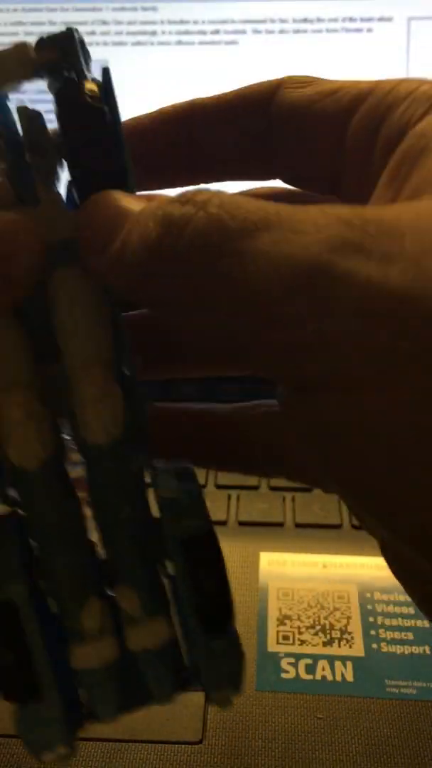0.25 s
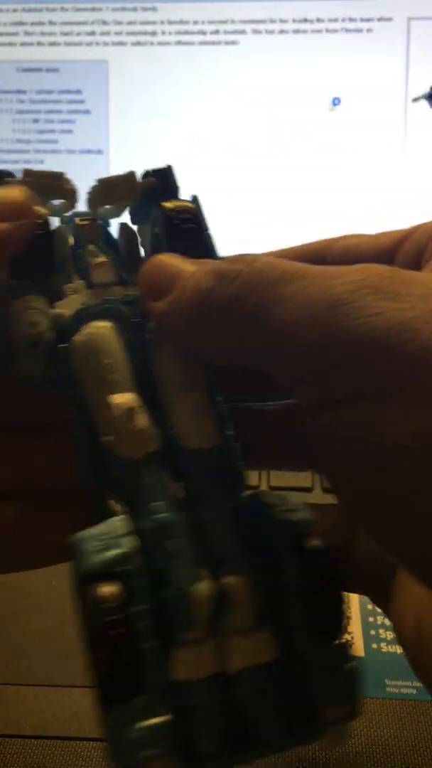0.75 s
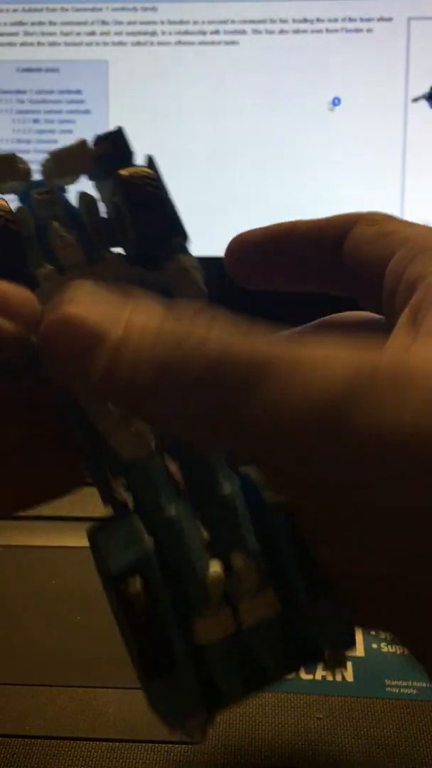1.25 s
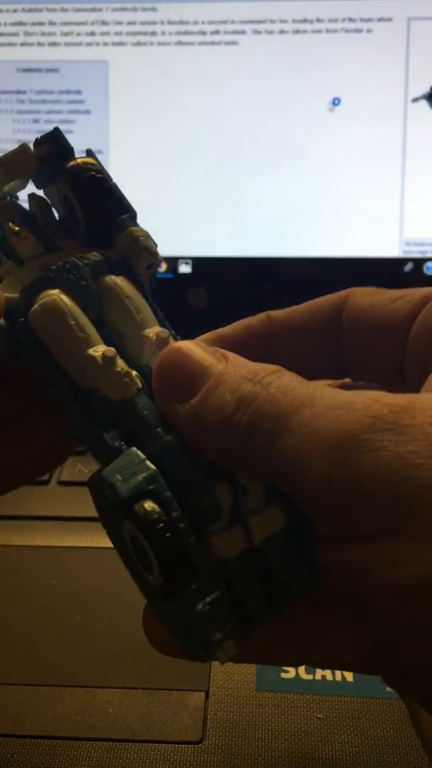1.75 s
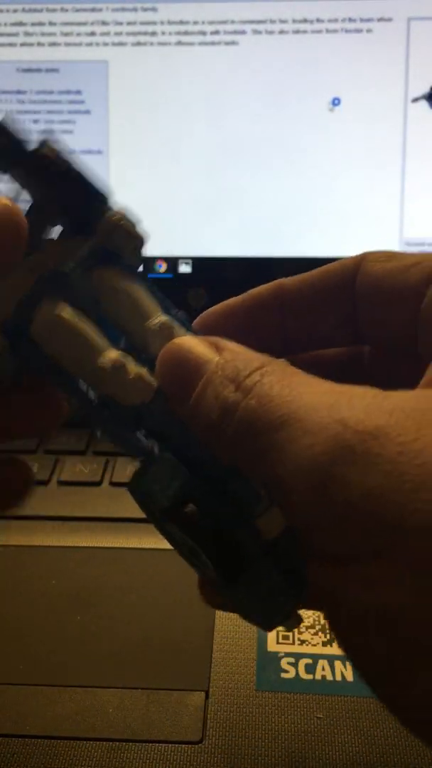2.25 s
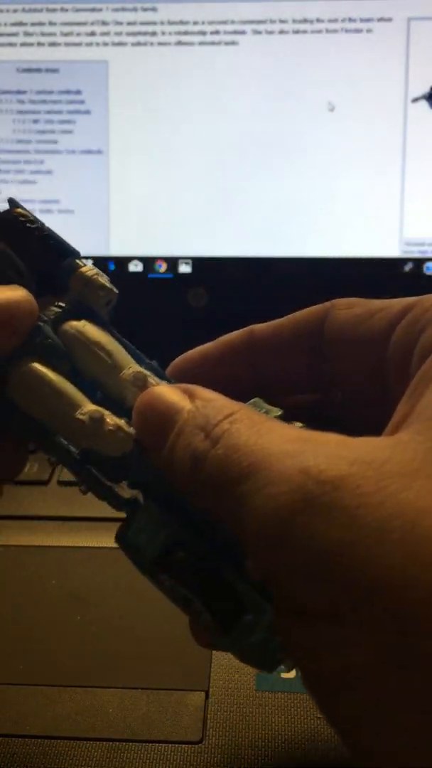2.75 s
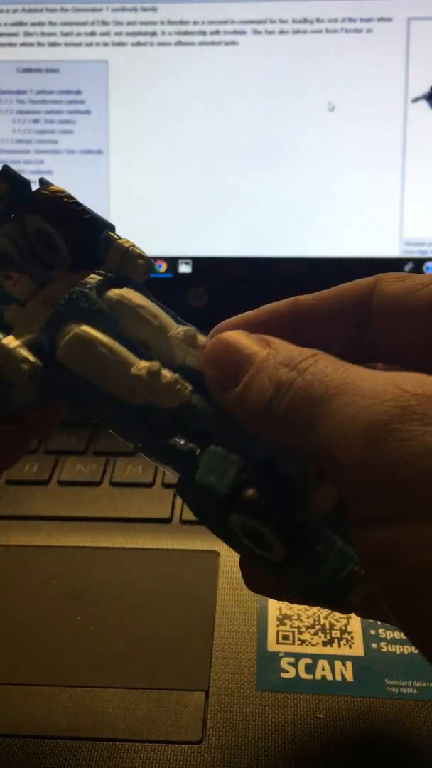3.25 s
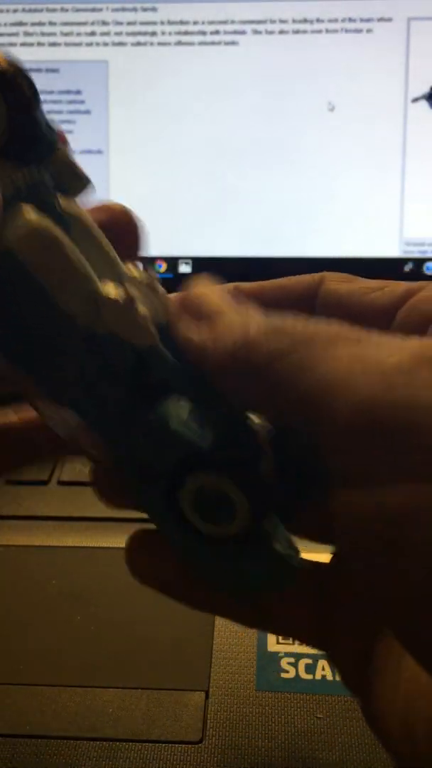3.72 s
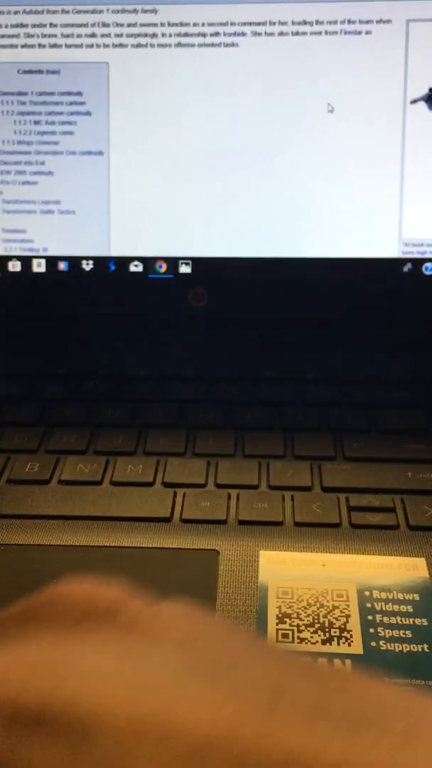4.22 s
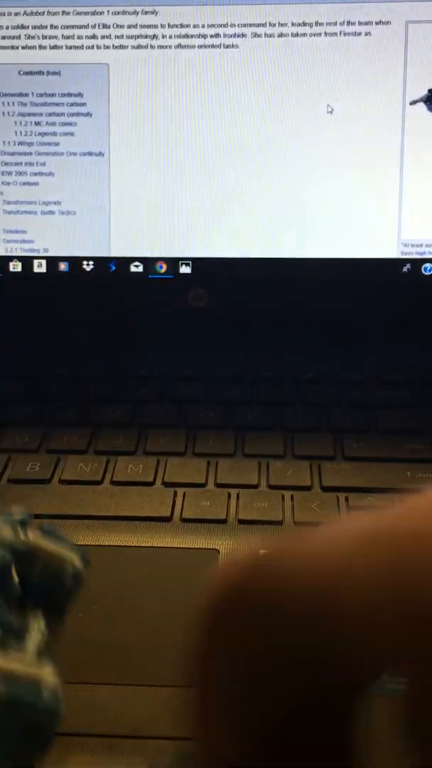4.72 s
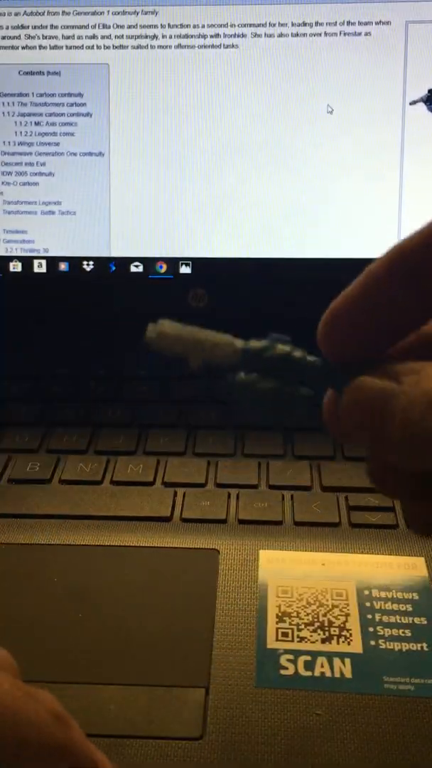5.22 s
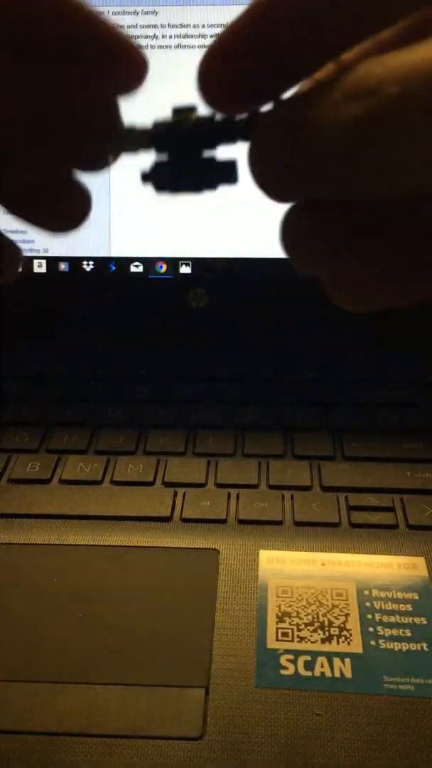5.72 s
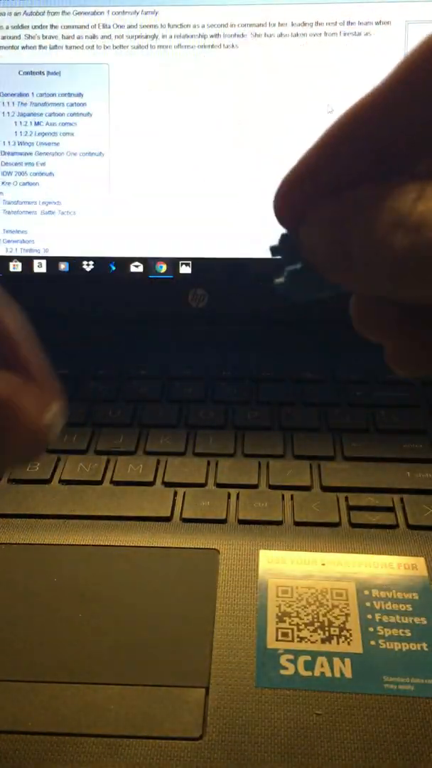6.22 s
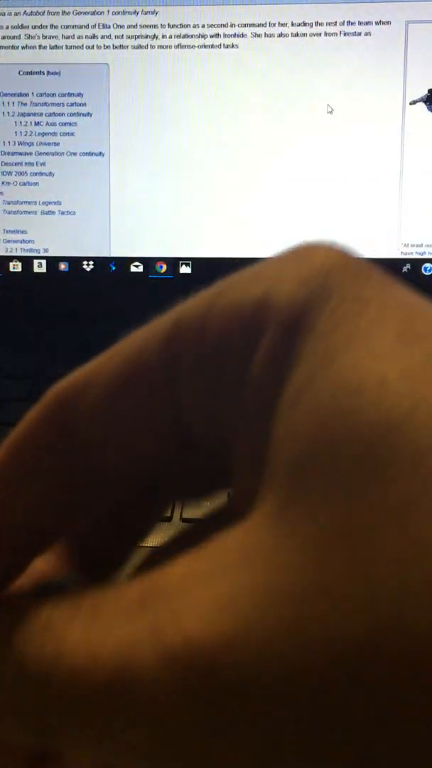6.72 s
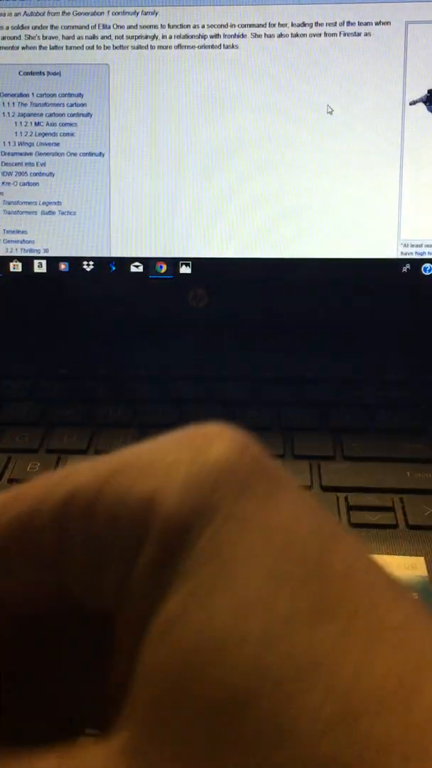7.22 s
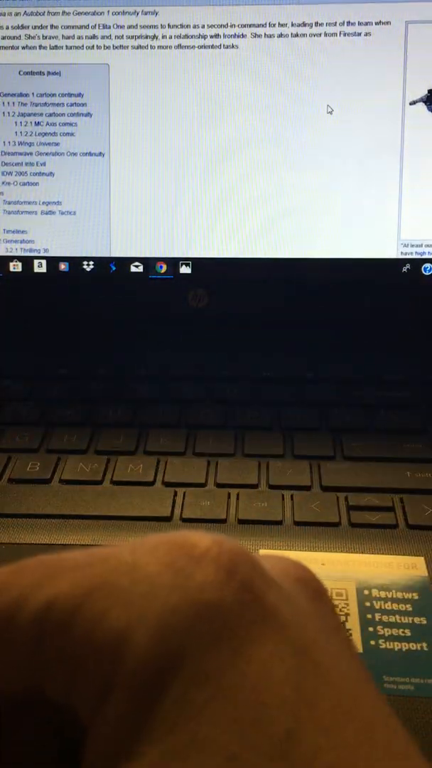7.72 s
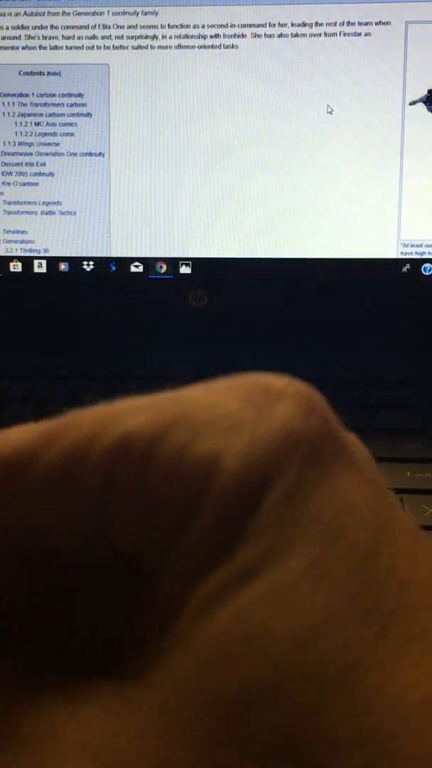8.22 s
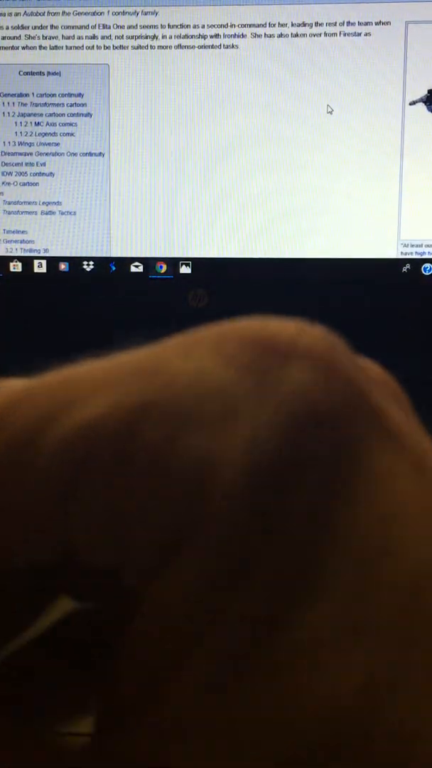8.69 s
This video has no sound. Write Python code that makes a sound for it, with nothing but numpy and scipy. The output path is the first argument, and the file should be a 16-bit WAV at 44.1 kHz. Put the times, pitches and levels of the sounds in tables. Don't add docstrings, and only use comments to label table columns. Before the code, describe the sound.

Close hollow plastic ticks and snaps as a toy figure is folded, then a small part bounces sharply on a laptop, followed by desk knocks and scuffs.

```python
import sys
import numpy as np
from scipy import signal
from scipy.fft import rfft, irfft, next_fast_len
from scipy.io import wavfile
from scipy.ndimage import uniform_filter1d

SR = 44100
rng = np.random.default_rng(int(sys.argv[2]) if len(sys.argv) > 2 else 0)


def to_linear_factor(level_db):
    exponent = np.asarray(level_db, float) / 20
    return 10 ** exponent


def generate_wav(sig):
    pcm = np.round(np.clip(np.atleast_2d(sig).T, -1, 1) * 32767).astype(np.int16)
    wavfile.write(sys.argv[1], SR, pcm)


N = 394694


def rms_one(x):
    return x / np.sqrt(np.mean(x ** 2) + 1e-20)


def peak_one(x):
    return x / np.max(np.abs(x))


def filtered(x, order, hz, kind):
    return signal.sosfilt(signal.butter(order, hz, kind, fs=SR, output="sos"), x)


def in_time(rows):
    s, *columns = np.transpose(rows)
    return [np.interp(np.arange(N) / SR, s, c) for c in columns]


def gated(spans, fade_db):
    out, edge_s = np.zeros(N), .015
    for start, top, end, db in spans:
        first = max(round((start - edge_s) * SR), 0)
        last = min(round((end + edge_s) * SR), N)
        during = np.arange(first, last)
        times_s = [start - edge_s, start, top, end, end + edge_s]
        levels_db = [-130, db - fade_db[0], db, db - fade_db[1], -130]
        out[during] += to_linear_factor(np.interp(during / SR, times_s, levels_db))
    return out


def drift(rate_hz):
    r = np.exp(-80 * np.pi * rate_hz / SR)
    slow = signal.lfilter([1], [1, -2 * r, r * r], rng.standard_normal(N // 40 + 2002))[2000:]
    return np.interp(np.arange(N) / 40, np.arange(len(slow)), rms_one(slow))


def coloured(spectrum, patchy_db):
    size = next_fast_len(N)
    hz = np.fft.rfftfreq(size, 1 / SR) + 1
    points = np.array(spectrum)
    level_db = np.interp(np.log(hz), np.log(points[:, 0]), points[:, 1], -90, -90)
    shaped = rfft(rng.standard_normal(size)) * to_linear_factor(level_db)
    register = np.floor(np.log2(hz / 20) / 2)
    out = 0
    for k in range(5):
        out = out + irfft(shaped * (register == k), size)[:N] * to_linear_factor(patchy_db * drift(2.8))
    return rms_one(out)


def slips(per_s, spread_db):
    size = to_linear_factor(spread_db * np.minimum(rng.exponential(1, N), 4))
    return size * rng.choice([-1, 1], N) * (rng.random(N) < per_s / SR)


def ring(x, hz, t60_s):
    r, w = to_linear_factor(-60 / (t60_s * SR)), 2 * np.pi * hz / SR
    return signal.lfilter([0, np.sin(w)], [1, -2 * r * np.cos(w), r * r], x + 1e-18)


def body(x, modes, scatter, near_hz=None, bend_share=.018):
    out = 0
    for (hz, db, t60_s), (spread, bend) in zip(modes, scatter):
        far_db = -5.5 * abs(np.log2(hz / near_hz)) if near_hz else 0
        mode = peak_one(ring(x, hz * (1 + bend_share * bend), t60_s))
        out = out + to_linear_factor(db + far_db + 1.8 * spread) * mode
    return peak_one(out)


# f/Hz, level/dB, t60/s
CASE_MODES = [(340, -19, 0.018), (455.3, 0, 0.06), (464, 3, 0.081), (574, 1, 0.027), (697, 11, 0.034),
              (857, 5, 0.08), (1040.6, -2.5, 0.078)]


def clicks(events, modes, edges, own_db, swell, after_db, cut_hz, own_t60_s, reach):
    out, t = np.zeros(N + 4096), np.arange(4096) / SR
    for s, peak_db, hz, crisp_db, contact_ms, *thump_db in events:
        chance, scatter = rng.standard_normal((2, len(t))), rng.standard_normal((3, 8, 2))
        spell = t / (max(contact_ms, .1) / 1000)
        force = peak_one(spell ** swell * np.exp(-2.5 * spell))
        shiver = np.minimum(spell, 1) * np.exp(-t / .009) * chance[1] ** 2
        chatter = (chance[0] * (force + to_linear_factor(after_db) * shiver))[:2048]
        snap = (chance[0] * force)[:2048]

        own = peak_one(ring(snap, hz, own_t60_s))
        bright = body(chatter, modes, scatter[1], hz) + to_linear_factor(own_db) * own
        blunt = signal.butter(2, min(reach * hz, .45 * SR), fs=SR)
        bright = peak_one(signal.lfilter(*blunt, bright))
        dull = hz < 3200 and peak_db < -24 and not thump_db
        crisp = body(snap, edges[:2] if dull else edges, scatter[2])
        bright = bright + to_linear_factor(crisp_db - 3.0) * crisp

        at = max(round((s - .00018 * swell * contact_ms) * SR), 0)
        out[at:at + len(bright)] += to_linear_factor(peak_db - 4.0) * filtered(bright, 5, cut_hz, "high")
        for db in thump_db:
            thump = body(force * np.abs(chance[0]), CASE_MODES, scatter[0], bend_share=.02)
            out[at:at + len(t)] += to_linear_factor(peak_db + db + 0.5) * filtered(thump, 6, 330, "high")
    return out[:N]


# f/Hz, level/dB, t60/s
SHELL_MODES = [(1320, -3, 0.0094), (1940, -7.5, 0.032), (2200, -8.5, 0.03), (2876, -8.5, 0.056),
               (3620, 7.5, 0.0022), (4438, 3.5, 0.005), (5508, 10, 0.0036), (6420, 4, 0.0068)]
# f/Hz, level/dB, t60/s
EDGE_MODES = [(8670, 8.5, 0.0056), (8930, 12, 0.0017), (11000, -2.5, 0.01), (11200, -6.5, 0.009),
              (15000, -10, .002)]
# t/s, peak/dB, contact/ms
UPPER_TICKS = [(.0014, -41.5, 4.7), (0.064, -30.5, 1.65), (0.0707, -33, 2.9), (0.112, -31, 0.7),
               (0.1395, -30.5, .6), (0.217, -33, 0.95), (0.241, -25.5, 1.3), (.261, -28, 1.3),
               (0.281, -24, 1.4), (.3422, -35.5, 0.37), (0.4272, -33.5, 1.84), (0.454, -35, 1.1),
               (.533, -42, 2), (1.5517, -36, 1.5), (2.717, -34.5, 1.6), (3.2784, -19, 1.07),
               (3.2874, -58, 2.2), (3.4453, -39.5, 2.9), (3.456, -35.5, 2), (3.4708, -25, 1.76),
               (3.9493, -35, 4.9), (3.9674, -43, 3.5), (3.9796, -40, 1.05), (4.029, -26, 0.96),
               (4.0594, -34, 0.72), (4.082, -30, 3)]
# t/s, peak/dB, contact/ms
LOWER_TICKS = [(0.1777, -31.5, 1.9), (0.289, -27, 0.52), (.3044, -39, 1.5), (.3254, -37.5, 1.2),
               (0.356, -37, 1.6), (0.3748, -35, 0.95), (0.3992, -36, 2), (.482, -41, 1.46),
               (.4954, -47, 1.5), (0.671, -40.5, 0.41), (1.208, -51, 1.7), (1.274, -42, 4.2),
               (1.3128, -50, 3.5), (1.421, -42, 2.8), (1.479, -32.5, 3.8), (2.379, -47, 1.4)]
# t/s, peak/dB, loudest f/Hz, contact/ms
PANEL_KNOCKS = [(.444, -35, 1210, 0.5), (0.9226, -33.5, 6000, 1.17), (1.4624, -17.5, 6850, 1.48),
                (1.5384, -15, 6400, 0.9), (1.572, -31, 6400, 1.34), (1.711, -47.5, 1340, 1.05),
                (1.783, -51, 1410, 0.72), (2.4613, -44, 2350, 3.5), (2.5465, -44, 2520, 0.9),
                (2.583, -28, 6640, 2.7), (2.663, -44.5, 1210, 2.7), (2.6997, -40.5, 2230, 0.8),
                (3.0807, -25, 4180, 3.1), (3.6584, -43, 2200, 2.64), (3.7728, -32, 2370, 0.6),
                (3.861, -26.5, 8940, 1.65), (4.013, -21, 3620, 1.37), (4.072, -22.5, 6400, 1.47),
                (4.346, -53, 1350, 0.95), (4.3815, -46, 3400, 1.5)]
# t/s, peak/dB, loudest f/Hz
SNAPS = [(.082, -27, 2830), (0.1517, -35, 2830), (0.19, -30, 3000), (0.236, -32, 2850), (.383, -25, 2920),
         (0.4666, -20.5, 2800), (0.5768, -33, 1880), (0.602, -49, 1840), (0.6528, -46, 7560),
         (0.709, -32.5, 2830), (0.9536, -40.5, 3100), (1.0134, -50, 1910), (1.1796, -50, 1230),
         (1.432, -36.5, 1940), (1.5274, -30, 4250), (1.6683, -48.5, 6200), (1.8333, -32, 6900),
         (1.8487, -21.5, 8170), (2.8777, -43, 6230), (3.022, -47.5, 7550), (3.26, -48, 6200),
         (3.6378, -48, 2460), (3.7925, -42, 2000), (3.8467, -42, 6250), (4.002, -46, 2820),
         (4.0236, -20.5, 4530), (4.0855, -26, 6400)]
# t/s, peak/dB, loudest f/Hz, rel thump/dB
DESK_KNOCKS = [(4.526, -43, 2580, 0), (4.5964, -33.5, 1220, -10), (4.833, -37, 4030, -27),
               (4.9207, -38.5, 3620, -30), (6.7881, -20, 3970, -19.5), (6.804, -21.5, 2350, -14),
               (6.8487, -26, 2820, -19), (7.333, -41.5, 2250, -24), (7.3521, -22.5, 3140, -26),
               (7.3772, -33, 3100, -9), (7.3932, -28, 3100, -8), (7.452, -38, 2780, -9),
               (7.481, -15.5, 5300, -24), (7.7727, -41.5, 2730, -1), (7.835, -26, 2030, -12),
               (7.9012, -40.5, 1485, 0), (7.9447, -45, 1930, -0.5)]
# t/s, peak/dB, loudest f/Hz, rel crispness/dB, rel thump/dB
DESK_SNAPS = [(4.6169, -32, 1230, -9, -6), (4.6524, -15, 3900, -8.5, -16), (4.8497, -26.5, 3560, 4.3, -39),
              (4.9604, -41.5, 1410, -20, -8), (6.1653, -50.5, 1980, 7, -12),
              (7.1806, -42.5, 2280, -8.5, -0.5), (7.4999, -11.5, 5400, -13, -16),
              (7.5983, -17, 4600, -6.5, -24), (7.664, -27, 2830, -9, -12), (7.845, -32.5, 2700, 5, -12),
              (7.9623, -54, 6450, -14.5, -5), (8.0641, -43, 4570, -10, -12), (8.1414, -60, 1230, 3, -3),
              (8.4206, -49.5, 8000, 15, 11), (8.5567, -50, 1320, -14.5, -9), (8.8239, -25, 4200, 3, -12),
              (8.8572, -27.5, 5260, -11.5, -7.5)]
UPPER_HZ, LOWER_HZ = 2850, 1830
TICK_CRISP_DB, KNOCK_CRISP_DB, SNAP_CRISP_DB = -12, -13.5, -3.5
SNAP_CONTACT_MS, DESK_KNOCK_MS, DESK_SNAP_MS = 2.1, 0.8, 1.6


def figure_clicks():
    events = [(s, db, UPPER_HZ, TICK_CRISP_DB, ms) for s, db, ms in UPPER_TICKS]
    events += [(s, db, LOWER_HZ, TICK_CRISP_DB, ms) for s, db, ms in LOWER_TICKS]
    events += [(s, db, hz, KNOCK_CRISP_DB, ms) for s, db, hz, ms in PANEL_KNOCKS]
    events += [(s, db, hz, SNAP_CRISP_DB, SNAP_CONTACT_MS) for s, db, hz in SNAPS]
    events += [(s, db, hz, KNOCK_CRISP_DB, DESK_KNOCK_MS, thump) for s, db, hz, thump in DESK_KNOCKS]
    events += [(s, db, hz, crisp, DESK_SNAP_MS, thump) for s, db, hz, crisp, thump in DESK_SNAPS]
    return clicks(sorted(events), SHELL_MODES, EDGE_MODES[:4], own_db=-3.5, swell=2.2, after_db=-19.0,
                  cut_hz=1230, own_t60_s=0.0087, reach=2.8)


# t/s, peak/dB, loudest f/Hz
GRIT = [(.0374, -51, 2770), (0.1347, -45, 3010), (0.1952, -39, 2770), (.2214, -44, 2780),
        (.3684, -47, 2800), (0.4615, -39, 1900), (.9318, -43, 3250), (.9444, -52, 3280),
        (1.2824, -50, 2500), (2.7244, -48, 2690), (7.1864, -49, 2270), (7.3614, -31.5, 3080),
        (7.367, -38, 3090), (7.3854, -38, 3110), (7.4024, -43, 3100), (7.5114, -46, 5200),
        (7.7594, -50, 1550), (7.8524, -46, 2720), (7.8714, -49, 1900), (7.8814, -54, 2000),
        (7.9663, -55, 1900), (7.984, -55, 2800), (8.0294, -58, 1840), (8.0544, -52, 2000),
        (8.0824, -50, 3000), (8.0914, -49, 2040), (8.1034, -53.5, 2270), (7.477, -46, 3400),
        (7.5925, -42, 2600), (1.456, -47, 2900), (7.732, -56, 1500), (7.689, -50, 1150)]
GRIT_MS, GRIT_GAIN_DB = 1.5, 3


def grit_clicks():
    events = [(s, db + GRIT_GAIN_DB, hz, KNOCK_CRISP_DB, GRIT_MS) for s, db, hz in GRIT]
    return clicks(events, SHELL_MODES, EDGE_MODES[:4], own_db=0.0, swell=1.2, after_db=-13,
                  cut_hz=1000, own_t60_s=0.011, reach=2.2)


# f/Hz, level/dB, t60/s
PART_MODES = [(2052, -21.5, 0.01), (2421, -12.5, 0.011), (3100, -7.5, 0.0089), (3810, -3.5, 0.0024),
              (4950, -12.5, 0.0031), (5600, -5, 0.0041), (5900, -2.5, 0.0041), (6400, -13.5, 0.0048)]
# t/s, peak/dB, loudest f/Hz, rel crispness/dB, rel thump/dB
DROPS = [(4.9954, -34, 4240, -18, 1), (5.001, -25.5, 4160, -24, 5.5), (5.0071, -3.5, 5430, -8.5, -5.5),
         (5.02, -16.5, 4100, -36.5, -4), (5.0262, -19.5, 2400, -13, 3), (5.0423, -18, 3100, -33, -47),
         (5.0514, -21.5, 5410, -23, -14.5), (5.06, -30.5, 2030, -30, -7), (5.3771, -1.5, 5440, -8, -15.5),
         (5.3825, -15, 2760, -27, -13), (5.442, 5, 5720, -8.5, -15), (5.4536, -16, 5600, -22, 3),
         (5.4632, -10, 5440, -24.5, -8.5), (5.3758, -17, 3487, -9.5, -5.5),
         (5.4392, -17, 3333, -11.5, -3.5)]
# t/s, peak/dB, loudest f/Hz, rel crispness/dB
FACES = [
    (5.3775, -7, 6700, -12),
    (5.378, -13, 10500, -6),
    (5.443, -12, 11000, -3),
    (5.0072, -10, 2800, -4),
    (5.306, -49, 2800, -20),
    (5.35, -49, 3600, -10),
]
DROP_CONTACT_MS = 1.89


def falling_part():
    drops = [(s, db, hz, crisp, DROP_CONTACT_MS, thump) for s, db, hz, crisp, thump in DROPS]
    bounces = clicks(drops, PART_MODES, EDGE_MODES, own_db=-6.0, swell=2.9, after_db=-23,
                     cut_hz=1800, own_t60_s=.006, reach=2.9)
    faces = [(*row, DROP_CONTACT_MS) for row in FACES]
    return bounces + clicks(faces, PART_MODES, EDGE_MODES, own_db=6.0, swell=2.9, after_db=-20,
                            cut_hz=1500, own_t60_s=.004, reach=2.1)


# start/s, fullest/s, end/s, level/dB
RATTLE = [(0.05, .3, .52, -62.5), (1.41, 1.45, 1.7, -58), (.92, .934, 0.98, -63), (2.465, 2.482, 2.56, -64),
          (2.69, 2.72, 2.77, -63), (3.4, 3.49, 4.4, -75), (3.93, 3.974, 4.67, -62),
          (4.5, 4.67, 4.86, -52.5), (7.175, 7.19, 7.21, -53.5), (7.35, 7.38, 7.42, -55),
          (7.72, 7.88, 7.92, -77), (7.98, 8.07, 8.25, -63)]
# f/Hz, level/dB, t60/s
HOLLOWS = [(1910, 1.3, 0.018), (2838, 0.5, 0.0055)]
RATTLE_FADE_DB = (12, 26)


def rattle():
    starts = np.abs(slips(per_s=300, spread_db=3.0))
    ticks = signal.lfilter([1], [1, -.975], starts) * rng.standard_normal(N)
    hollow = rms_one(sum(to_linear_factor(db) * rms_one(ring(ticks, hz, t60_s)) for hz, db, t60_s in HOLLOWS))
    hard = SHELL_MODES[1:] + EDGE_MODES[:2]
    shell = rms_one(sum(to_linear_factor(db) * rms_one(ring(ticks, hz, .6 * t60_s)) for hz, db, t60_s in hard))
    turning, = in_time([(0, 0.79), (.6, 0.92), (1.6, 0.48), (4.1, 0.42), (4.4, 0.084)])
    return to_linear_factor(3.5) * gated(RATTLE, RATTLE_FADE_DB) * (turning * hollow + to_linear_factor(-9.5) * shell)


# start/s, fullest/s, end/s, level/dB
DRAGS = [
    (7.35, 7.385, 7.44, -49.5),
    (7.68, 7.84, 7.82, -56),
    (7.95, 8.07, 8.14, -57),
]
DRAG_FADE_DB = (25, 28.5)


def drags():
    impacts = np.abs(slips(per_s=710, spread_db=-2.0))
    lumps = signal.lfilter([1], [1, -.99], impacts) * rng.standard_normal(N)
    case = rms_one(sum(to_linear_factor(db) * rms_one(ring(lumps, hz, 0.76 * t60_s)) for hz, db, t60_s in CASE_MODES))
    scuff = rms_one(filtered(lumps, 2, [800, 2200], "band"))
    moved = filtered(case + to_linear_factor(-8.5) * scuff, 4, 400, "high")
    return to_linear_factor(6.5) * gated(DRAGS, DRAG_FADE_DB) * moved


# t/s, f/Hz, peak/dB, build-up/s, t60/s
SHOVES = [(7.392, 458, -37, .022, 0.14), (7.378, 689, -41, 0.013, .1), (7.385, 899, -44.5, .016, .07),
          (7.385, 210, -52, .015, .08), (7.484, 680, -41.5, .003, .05), (7.6, 700, -41.5, .003, .04),
          (7.738, 668, -53, .005, .04), (7.766, 670, -51, .008, .06), (7.826, 668, -48, 0.0095, 0.038),
          (7.843, 651, -38.5, 0.0074, .03), (7.842, 888, -47, 0.0089, .03), (7.903, 681, -49.5, .004, .04),
          (7.971, 668, -53.5, .004, 0.036), (8.016, 977, -58, .004, 0.042), (8.045, 428, -51.5, .008, .06),
          (8.055, 676, -50, .005, .04), (8.065, 665, -52, .004, .05), (8.055, 194, -53, .02, .08),
          (8.09, 200, -53, .015, .07), (8.09, 800, -55, .012, 0.064), (4.53, 700, -50, 0.00397, .05),
          (4.655, 1150, -40, 0.00308, 0.047), (4.19, 270, -57, .03, 0.16), (3.9, 250, -58, 0.018, .12),
          (7.6, 740, -44.5, 0.0035, .05), (7.455, 950, -51, .003, 0.045), (5.446, 1050, -27, .002, 0.043),
          (5.012, 395, -30, .003, 0.069)]


def shoves():
    out, t = np.zeros(N + 8192), np.arange(8192) / SR
    for s, hz, db, build_s, t60_s in SHOVES:
        phase = rng.uniform(0, 2 * np.pi)
        rough = rms_one(ring(rng.standard_normal(len(t)), hz, .012))
        since_top = t - 2 * build_s
        rise, decay = np.exp(-(since_top / build_s) ** 2), to_linear_factor(-60 * since_top / t60_s)
        swell = np.where(since_top < 0, rise, decay)
        tone = np.sin(2 * np.pi * hz * t + phase)
        at = round((s - 2 * build_s) * SR)
        push = tone + .55 * rough * np.exp(-np.maximum(since_top, 0) / .015)
        out[at:at + len(t)] += to_linear_factor(db) * swell * push
    return out[:N]


# t/s, peak/dB
BOOMS = [
    (5.011, -41),
    (5.381, -43.5),
    (5.446, -31.5),
    (7.386, -55),
    (8.06, -52),
]
# f/Hz, level/dB, t60/s
DESK_TOP = [(65, -8.5, 0.16), (93.75, -3.5, .24), (138.3, 6, 0.13), (190, -4.5, 0.2)]


def booms():
    pushes = np.zeros(N)
    for s, db in BOOMS:
        pushes[round(s * SR)] = to_linear_factor(db)
    soft = np.convolve(pushes, np.hanning(160) / 80)[:N]
    shaken = sum(to_linear_factor(db) * ring(soft, hz, t60_s) for hz, db, t60_s in DESK_TOP)
    return filtered(shaken, 4, 55, "high")


# t/s, f/Hz, peak/dB
SQUEAKS = [
    (4.856, 3100, -42),
    (5.371, 3152, -52),
    (8.15, 1115, -55.5),
    (8.557, 1290, -55),
]
SQUEAK_S = 0.006


def squeaks():
    t, waver = np.arange(N) / SR, np.cumsum(drift(38.6)) / SR
    out = 0
    for s, hz, db in SQUEAKS:
        burst = np.exp(-((t - s) / SQUEAK_S) ** 2)
        out = out + to_linear_factor(db) * burst * np.sin(2 * np.pi * hz * (t + 0.062 * waver))
    return out


# start/s, fullest/s, end/s, level/dB
RUB = [
    (0.0, .282, 0.44, -59.5),
    (3.99, 4.194, 4.6, -56),
    (4.45, 4.6, 5.1, -60.5),
    (5.02, 5.9, 6.24, -55.5),
    (6.3, 6.4, 7.02, -59),
    (7.45, 7.8, 8.56, -60),
]
# f/Hz, density/dB per Hz
CLOTH = [(88, -52.5), (150, -5.5), (282, 0.5), (617, -3), (748, -8.5), (1380, -8.5), (1590, -13.5),
         (4000, -24), (5200, -47), (8800, -120)]
# f/Hz, density/dB per Hz
SKIN = [(1470, -17.5), (2500, 4), (2760, -2), (4040, -5), (4570, -8), (9300, -9), (16600, -14.5),
        (17600, -9.5), (18000, -31.5)]
# start/s, end/s, first level/dB, last level/dB, brightest f/Hz
STROKES = [
    (2.158, 2.37, -62, -75, 7600),
    (4.49, 4.946, -65, -70.5, 8050),
    (5.05, 5.43, -63.5, -61, 7780),
    (5.49, 5.849, -63.5, -62.5, 8065),
    (6.357, 6.773, -65, -71, 10040),
    (6.957, 7.115, -90, -80, 9100),
    (8.186, 8.35, -61.5, -78, 9970),
]
# start/s, fullest/s, end/s, level/dB
BRUSHES = [(1.01, 1.02, 1.01, -67), (1.615, 1.63, 1.62, -65.5), (2.33, 2.355, 2.35, -64),
           (2.47, 2.485, 2.48, -66), (2.695, 2.715, 2.68, -70), (2.92, 2.96, 2.95, -68),
           (3.02, 3.03, 3.03, -67), (3.255, 3.265, 3.25, -66), (3.39, 3.41, 3.4, -70),
           (3.632, 3.645, 3.65, -63.5), (3.78, 3.797, 3.89, -66), (3.825, 3.845, 3.88, -64),
           (7.355, 7.385, 7.415, -57.5), (7.765, 7.79, 7.805, -67), (7.84, 7.85, 7.86, -58),
           (7.895, 7.903, 7.86, -64), (7.955, 7.97, 7.87, -68), (8.03, 8.065, 8.01, -62.5)]
RUB_FADE_DB, BRUSH_FADE_DB = (6.5, 15.5), (7.5, 9.5)
BRUSH_LOW_HZ, BRUSH_HIGH_HZ = 4200, 11000


def rubbing():
    out = to_linear_factor(-5.5) * gated(RUB, RUB_FADE_DB) * coloured(CLOTH, patchy_db=0.15)
    skin = coloured(SKIN, patchy_db=2.5)
    for start, end, first_db, last_db, hz in STROKES:
        level_db, = in_time([(start - .08, -90), (start, first_db), (end, last_db), (end + 0.076, -90)])
        stroke = filtered(skin, 2, [hz / 2.1, min(hz * 2.2, .45 * SR)], "band")
        out = out + to_linear_factor(level_db) * stroke
    fingertips = rms_one(filtered(skin, 2, [BRUSH_LOW_HZ, BRUSH_HIGH_HZ], "band"))
    return out + gated(BRUSHES, BRUSH_FADE_DB) * fingertips


# t/s, rise/dB
SURGES = [
    (1.1, 5),
    (3.05, 5.5),
    (6.03, 3),
]
RUMBLE_DB, SURGE_S = -58.5, 0.23


def rumble_db():
    t = np.arange(N) / SR
    return RUMBLE_DB + sum(db * np.exp(-((t - s) / SURGE_S) ** 2) for s, db in SURGES)


# f/Hz, density/dB per Hz
ROOM_TONE = [(68, -34.5), (115, 1.5), (187, -8.5), (339, -0.5), (430, -14), (699, -12), (1000, -12),
             (1210, -13.5), (1570, -17.5), (2290, -18), (11800, -36.5), (16500, -32), (18400, -54.5)]
# f/Hz, density/dB per Hz
RUMBLE = [(13, -54), (22, -25.5), (41, -16.5), (59, 3), (84, 1), (120, -11.5), (160, -43.5), (260, -120)]
# f/Hz, width/Hz, level/dB
FAN = [(172, 12, -79), (237.1, 9, -73), (338.7, 8, -72.5), (683, 38, -81)]
ROOM_TONE_DB = -72


def hum():
    white = rng.standard_normal(N)
    whirr = 0
    for hz, width_hz, db in FAN:
        t60_s = np.log(1000) / np.pi / width_hz
        whirr = whirr + to_linear_factor(db) * rms_one(ring(white, hz, t60_s))
    steady = coloured(ROOM_TONE, patchy_db=.3)
    rumble = coloured(RUMBLE, patchy_db=0)
    power = uniform_filter1d(uniform_filter1d(rumble ** 2, size=1500), size=1500)
    even = rms_one(rumble / np.sqrt(power + .02) ** .85)
    return to_linear_factor(ROOM_TONE_DB + 4.0) * steady + to_linear_factor(rumble_db() - 4.5) * even + whirr


ROOM_T60_S, WALL_CUT_HZ, ROOM_DB = .135, 7500, -22


def room(x):
    size = next_fast_len(N + SR)
    w = 2 * np.pi * np.fft.rfftfreq(size)
    dull = 1 / (1 + 1j * w * SR / (2 * np.pi * WALL_CUT_HZ))
    answer = 0
    for k, lag_s in enumerate(rng.uniform(0.0068, 0.024, size=10)):
        once = to_linear_factor(-60 * lag_s / ROOM_T60_S) * dull * np.exp(-1j * w * lag_s * SR)
        answer = answer + (-1) ** k * once / (1 - once)
    return irfft(rfft(x, size) * answer, size)[:N]


def scene():
    near = figure_clicks() + grit_clicks() + falling_part()
    near = near + rattle() + drags() + shoves() + booms()
    around = squeaks() + rubbing() + hum()
    return (near + to_linear_factor(ROOM_DB) * room(near) + around)[None, :]


def low_pass(x):
    return signal.sosfilt(signal.butter(12, 18510, fs=SR, output="sos"), x)


# f/Hz, width/Hz, depth/0-1
MIC_DIPS = [(4560, 230, 0.01), (8256, 520, 0), (10500, 360, 0.5)]


def record(dry):
    heard = filtered(dry, 12, 17500, "low")
    for hz, width_hz, depth in MIC_DIPS:
        heard = heard - depth * signal.lfilter(*signal.iirpeak(hz, hz / width_hz, fs=SR), heard)
    return low_pass(heard)


dry = scene()
out = record(dry)
generate_wav(out)
```